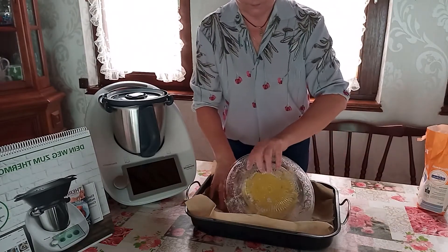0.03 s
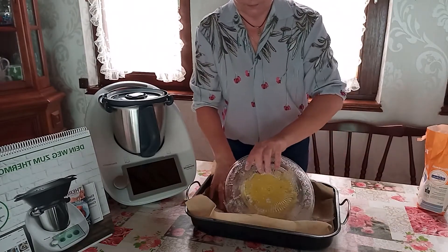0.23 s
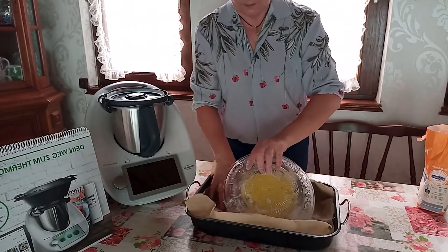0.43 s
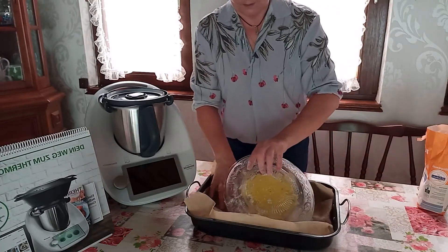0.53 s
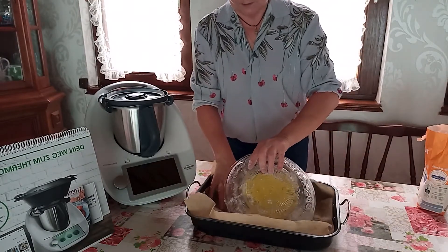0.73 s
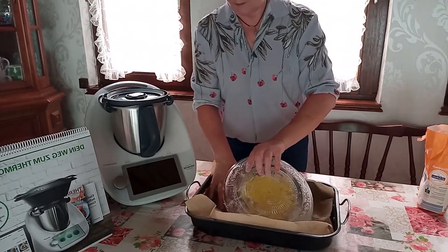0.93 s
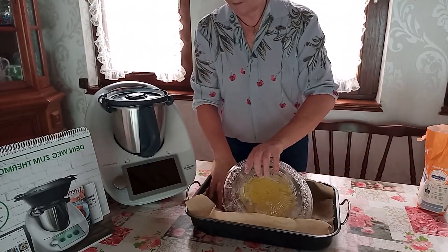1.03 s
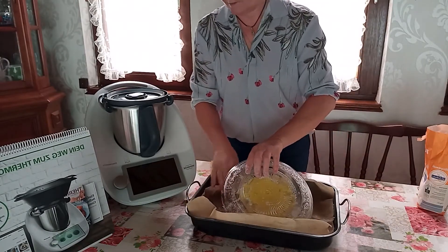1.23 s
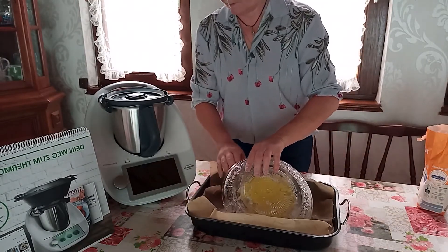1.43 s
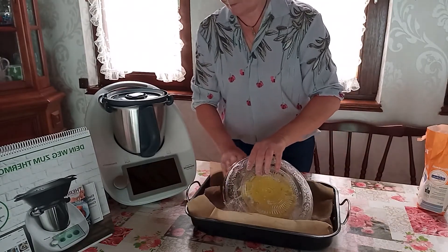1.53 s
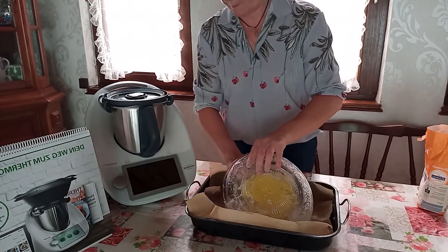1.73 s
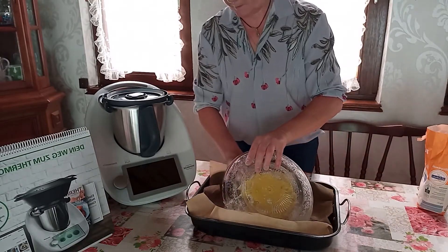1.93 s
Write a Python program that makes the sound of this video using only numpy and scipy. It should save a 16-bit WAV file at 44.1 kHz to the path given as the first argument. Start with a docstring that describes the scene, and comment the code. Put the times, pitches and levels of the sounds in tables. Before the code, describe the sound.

Baking paper crackles loudly as it is pushed into a metal tray, then rustles quietly under sliding fingers. A glass bowl lightly touches the lined tray and the table thuds softly, over a faint hum in a small kitchen.

```python
"""Small kitchen: a hand pushes baking parchment into a metal tray. Four loud strokes crumple it, tiny buckles
over sliding friction, with a broad sheet resonance that sinks as the paper slackens. Softer smoothing follows;
single creases snap throughout. A glass bowl touches the lined tray lightly, the air in the tray booms, the
table takes a few dull bumps, and a faint hum stands in the room."""
import sys
import numpy as np
from scipy import signal
from scipy.fft import rfft, irfft
from scipy.io import wavfile

SR = 44100
rng = np.random.default_rng(int(sys.argv[2]) if len(sys.argv) > 2 else 0)


def int16_out(signal):
    """Quantize to a 16-bit WAV file."""
    q = np.round(np.clip(np.atleast_2d(signal).T, -1, 1) * 32767)
    wavfile.write(sys.argv[1], SR, q.astype(np.int16))


N = 88200
TIME_S, BIN_HZ = np.arange(N) / SR, np.fft.rfftfreq(N, 1 / SR)
STROKE_LAG_MS, RUMBLE_CUT_HZ = 0.077, 123


# crumpling spectrum: (frequency [Hz], relative density [dB])
CRUMPLE_SPECTRUM = [(80, -17), (145, -14.5), (200, -17), (290, -9), (480, -7.5), (600, -2), (810, -2),
                    (1250, -2.5), (1450, -5), (1750, -3.5), (2250, -2.5), (3300, -3), (5000, -4.5),
                    (6100, -8.5), (7700, -7), (9200, -10.5), (12000, -6), (15800, -13.5)]
# stroke envelope: (time [s], relative level [dB], bass [dB], treble [dB])
STROKES = [(0.03, -71.5, 3, -6), (0.065, -63, -5, -2.5), (0.085, -51, -3, -1.5), (0.115, -45.5, -5.5, 1),
           (0.155, -36, -1.5, 0.5), (0.19, -39, -0.5, -3), (0.225, -43, 3.5, 4), (0.27, -53.5, 5, -2),
           (0.305, -50.5, -2, -5), (0.33, -35.5, -1, 1.5), (0.35, -33.5, 2.5, 0), (0.38, -37, -4.5, -4.5),
           (0.415, -36.5, 0.5, 3.5), (0.445, -38.5, -3.5, -2), (0.468, -44, -2, -5),
           (0.492, -42.5, -2, 5.5), (0.522, -36, -0.5, 2), (0.555, -41, 1, -4), (0.588, -37, -0.5, 0),
           (0.62, -48, -0.5, 2), (0.648, -46.5, 2.5, -1.5), (0.672, -37, 2, 3), (0.722, -38.5, 1.5, -1),
           (0.755, -35.5, -2, -0.5), (0.79, -42.5, -1, 2), (0.825, -50, -0.5, -3), (0.868, -45, 2, -2),
           (0.92, -57, -2.5, -4)]

def crumpling():
    """Four pushes: dense buckling over the hiss of sliding paper."""
    level_db, bass_db, treble_db = envelopes(STROKES)
    paper = crackle(rate_per_s=1700, scatter_s=0.0021, scatter_db=5, friction_db=3.5)
    paper = flap_and_crease(spread(paper, CRUMPLE_SPECTRUM), bass_db, treble_db)
    paper = delay_left(butter(paper, RUMBLE_CUT_HZ, "high"), STROKE_LAG_MS)
    pushing = TIME_S < SMOOTHING[0][0]
    return kitchen(paper * from_db(level_db + 3) * pushing, wet_db=-11)


def crackle(rate_per_s, scatter_s, scatter_db, friction_db):
    """Tiny buckles of random size, each scattered briefly by sheet and tray, over smooth friction."""
    onsets = rng.random(N) < rate_per_s / SR
    sizes = onsets * np.minimum(rng.exponential(1, N), 1.22)
    buckles = unit_rms(sizes * rng.choice([-1, 1], (2, N)))
    power = signal.lfilter([1], [1, -np.exp(-1 / (scatter_s * SR))], sizes ** 2)
    scatter = unit_rms(np.sqrt(power) * rng.standard_normal((2, N)))
    return buckles + from_db(scatter_db) * scatter + from_db(friction_db) * rng.standard_normal((2, N))


def flap_and_crease(x, bass_db, treble_db, bass_hz=1300, treble_hz=6800):
    """Broad flapping adds bass, tight creasing adds treble."""
    low = irfft(rfft(x) / (1 + (BIN_HZ / bass_hz) ** 4), N)
    high = x - irfft(rfft(x) / (1 + (BIN_HZ / treble_hz) ** 4), N)
    return low * from_db(bass_db) + (x - low - high) + high * from_db(treble_db)


# sheet resonances: (time [s], length [s], level [dB], start pitch [Hz], end pitch [Hz])
BULGES = [(0.125, .12, -49, 800, 399.7), (0.325, 0.12, -46, 520, 219.6), (0.488, 0.14, -52.5, 1100, 561.4),
          (0.66, .14, -47.5, 950, 521.6), (0.68, 0.196, -58, 328.6, 252.3), (0.948, 0.16, -62, 1350, 1091),
          (1.221, 0.1204, -66.5, 750, 500)]

def bulging(q=1.8, side_db=-18):
    """A broad sheet resonance: a noise band that sinks as the paper slackens."""
    bands = 0
    for start_s, length_s, db, start_hz, end_hz in BULGES:
        hz = np.exp(np.interp(TIME_S, [start_s, start_s + length_s], np.log([start_hz, end_hz])))
        phase = 2 * np.pi * np.cumsum(hz) / SR
        width_hz = np.sqrt(start_hz * end_hz) / q
        slow = unit_rms(butter(rng.standard_normal((2, 2, N)), width_hz / 2, "low"))
        mid, side = slow[0] * np.cos(phase) + slow[1] * np.sin(phase)
        bands += from_db(db) * swell(start_s, length_s) * (mid + from_db(side_db) * side * [[1], [-1]])
    return kitchen(delay_left(butter(bands, RUMBLE_CUT_HZ, "high"), STROKE_LAG_MS), wet_db=-4)


# rubbing spectrum: (frequency [Hz], relative density [dB])
RUB_SPECTRUM = [(230, -10.5), (350, -2.5), (600, 0.5), (1000, -2), (1300, -1), (1700, -3.5), (2300, 1.5),
                (3200, 0), (4700, -3), (6400, -7), (7800, -6), (9200, -10.5), (12500, -6.5), (15800, -16)]
# smoothing envelope: (time [s], relative level [dB], bass [dB], treble [dB])
SMOOTHING = [(0.92, -59, 2, 6), (1.0, -57, 0.5, 3), (1.1, -65, 5.5, 6), (1.17, -64, 0, 8),
             (1.235, -58, 2, -0.5), (1.262, -53.5, -2, 9.5), (1.3, -61.5, 4, 8.5), (1.35, -77.5, 3, 10),
             (1.385, -63, -5, 9.5), (1.48, -79, 7, 3), (1.515, -66.5, -2, 7.5), (1.55, -56, 4, -0.5),
             (1.615, -56.5, -1.5, -5), (1.66, -56, 0.5, -1), (1.7, -66, 4, 3), (1.735, -59, -11, 7),
             (1.79, -76, -8, 6), (1.835, -70, 7, 0.5), (1.855, -60, 1, 1.5), (1.905, -71, -6, -4),
             (1.925, -63, 3, -22), (1.955, -61.5, -4, 1), (1.972, -50, -4.5, -8), (2.0, -50.5, -5, -2)]

def smoothing():
    """Fingers slide over the sheet: sparser, softer crackle."""
    level_db, bass_db, treble_db = envelopes(SMOOTHING)
    paper = crackle(rate_per_s=600, scatter_s=0.0023, scatter_db=7, friction_db=6.5)
    paper = flap_and_crease(spread(paper, RUB_SPECTRUM), bass_db, treble_db)
    paper = delay_left(paper, lag_ms=-0.042)
    sliding = TIME_S >= SMOOTHING[0][0]
    return kitchen(paper * from_db(level_db + 1.24) * sliding, wet_db=-7)


# crease snaps: (time [s], relative ring level [dB], pitch [Hz], relative crack level [dB])
SNAPS = [(0.028, -54, 2890, -47.5), (0.085, -29, 4200, -37), (0.325, -38, 2330, -27),
         (0.336, -25, 9000, -26), (0.357, -18.5, 4640, -21), (0.854, -36, 3000, -31.5),
         (0.942, -46, 4050, -45), (1.205, -41, 3440, -45), (1.248, -35, 4480, -34),
         (1.255, -33.5, 4560, -37.5), (1.2898, -33, 2870, -46), (1.363, -65, 5940, -54),
         (1.374, -46, 2800, -46.5), (1.498, -56, 4030, -57), (1.632, -30, 4900, -40.5),
         (1.649, -46, 5800, -40), (1.709, -43.5, 3500, -36.5), (1.8409, -34.5, 5130, -54),
         (1.915, -55, 2160, -48), (1.9646, -40, 2610, -35)]

def snaps(width_hz=1330, flutter_s=0.0014):
    """A crease flips: a sharp fluttering crack with a very short ring of its own."""
    cracks, t = np.zeros((2, N + SR)), TIME_S[:N // 100]
    radius = np.exp(-np.pi * width_hz / SR)
    numerator = np.array([1, 0, -1]) * (1 - radius ** 2) / 2
    for start_s, ring_db, hz, crack_db in SNAPS:
        flutter = rng.choice([-1., 1.], (2, len(t))) * np.exp(-t / flutter_s)
        flutter *= from_db(7) / np.sqrt(np.sum(flutter[0] ** 2))
        denominator = [1, -2 * radius * np.cos(2 * np.pi * hz / SR), radius ** 2]
        ringing = signal.lfilter(numerator, denominator, flutter)
        start = int(start_s * SR)
        cracks[:, start:start + len(t)] += from_db(ring_db + 9.5) * ringing + from_db(crack_db) * flutter
    return kitchen(butter(cracks[:, :N], 910, "high"), wet_db=1.5)


# bowl contacts: (time [s], impulse level [dB])
TOUCHES = [(0.316, -41), (1.709, -56), (1.914, -56)]
# bowl-on-tray modes: (frequency [Hz], gain [dB], T60 [s])
TRAY_MODES = [(570, -16.5, .06), (826, -5.5, 0.036), (914, -2, 0.026), (1310, -8, 0.032), (1735, -6, 0.06),
              (2110, -5, 0.035)]

def bowl():
    """Glass touches the tray lightly; the paper damps the ring."""
    hits = butter(impulses(TOUCHES), 200, "high")
    return kitchen(sum(from_db(db) * ring(hits, hz, t60_s) for hz, db, t60_s in TRAY_MODES), wet_db=-5)


# tray air booms: (time [s], length [s], level [dB])
BOOMS = [(0.167, 0.16, -70.5), (0.326, 0.37, -65), (0.673, 0.19, -73.5)]
# dull bumps: (time [s], impulse level [dB])
BUMPS = [(0.236, -62), (0.575, -60), (0.79, -63), (0.88, -68), (1.28, -75), (1.77, -70)]

def tray_and_table():
    """The air in the tray booms under the pushes and the table thuds under the hand."""
    pushes = sum(from_db(db) * swell(start_s, length_s) for start_s, length_s, db in BOOMS)
    boom = pushes * unit_rms(ring(rng.standard_normal(N), hz=137.3, t60_s=0.34))
    thuds = ring(impulses(BUMPS), hz=54, t60_s=0.17)
    return (boom + thuds) * from_db([[-2], [1.5]])


# hum tones: (frequency [Hz], base rms level [dB])
HUM_TONES = [(344.5, -73.5), (409.1, -83), (540, -78.5)]
# hum envelope: (time [s], gain [dB])
HUM_SWELL = [(0, -1.5), (0.95, -2.5), (1.15, 1), (1.6, 0), (2.0, -10.5)]

def hum(waver_hz=8.02):
    """Three faint tones waver in level and phase, swell and fade."""
    tones = 0
    for hz, db in HUM_TONES:
        waver = 1.16 + drift(waver_hz) + 1j * drift(waver_hz)
        tones += from_db(db) * unit_rms(np.real(np.exp(2j * np.pi * hz * TIME_S) * waver))
    return tones * from_db(envelopes(HUM_SWELL)[0])


# room air spectrum: (frequency [Hz], relative density [dB])
AIR_SPECTRUM = [(45, -3), (84, 1.5), (157, -3), (360, -0.5), (600, -1.5), (900, -22), (3000, -33),
                (7000, -48), (11000, -54), (15800, -32)]

def room_air(level_db=-72):
    """Steady, dull noise."""
    return from_db(level_db) * spread(rng.standard_normal((2, N)), AIR_SPECTRUM)


def kitchen(x, wet_db, t60_s=0.43, treble_t60_s=0.3, treble_hz=6800, first_echo_s=0.0014):
    """Direct sound plus dense reflections whose treble dies sooner."""
    t = TIME_S[:N // 4]
    noise = rng.standard_normal((2, len(t)))
    dull = butter(noise, treble_hz, "low", order=1)
    tail = dull * from_db(-60 * t / t60_s) + (noise - dull) * from_db(-60 * t / treble_t60_s)
    tail *= t > first_echo_s
    tail /= np.sqrt(np.sum(tail ** 2) / 2)
    return x + from_db(wet_db) * signal.fftconvolve(np.atleast_2d(x), tail, axes=1)[:, :N]


# left-right likeness: (frequency [Hz], correlation [-1..1])
CORRELATION = [(60, 0), (250, 0.4), (600, 0.88), (1200, 0.24), (2500, 0.3), (5000, -0.03), (15000, -0.07)]
# stereo balance: (frequency [Hz], left minus right [dB])
BALANCE = [(60, 1), (250, -2), (600, -1.5), (4000, -0.5), (10000, 0.5)]

def spread(pair, spectrum):
    """Two signals become one coloured stereo sound, most alike in the low mids; rms 1."""
    corner_hz = spectrum[0][0] / 2
    low_cut = BIN_HZ ** 2 / (BIN_HZ ** 2 + corner_hz ** 2)
    mid, side = rfft(pair) * from_db(per_bin(spectrum)) * low_cut
    correlation, sign = per_bin(CORRELATION), np.array([[1], [-1]])
    stereo = np.sqrt(1 + correlation) * mid + sign * np.sqrt(1 - correlation) * side
    return unit_rms(irfft(stereo * from_db(sign * per_bin(BALANCE) / 2), N))


def delay_left(x, lag_ms):
    """An off-centre source arrives later on the left; earlier if the lag is negative."""
    shift = np.exp(-2j * np.pi * BIN_HZ * lag_ms / 1000)
    return np.array([irfft(rfft(x[0]) * shift, N), x[1]])


def ring(x, hz, t60_s):
    """One mode: a unit impulse starts a decaying sine of height 1."""
    radius, angle = from_db(-60 / (t60_s * SR)), 2 * np.pi * hz / SR
    return signal.lfilter([0, np.sin(angle)], [1, -2 * radius * np.cos(angle), radius ** 2], x)


def impulses(rows):
    """One impulse per row."""
    x = np.full(N, 1e-18)
    for time_s, db in rows:
        x[int(time_s * SR)] = from_db(db)
    return x


def swell(start_s, length_s):
    """A rounded rise and a longer fall."""
    corners_s = [start_s, start_s + 0.3 * length_s, start_s + length_s]
    return np.sin(np.pi / 2 * np.interp(TIME_S, corners_s, [0, 1, 0]))


def drift(rate_hz):
    """Slow random wander, rms about 1."""
    return np.interp(TIME_S * rate_hz, np.arange(4000), rng.standard_normal(4000)) * np.sqrt(3 / 2)


def envelopes(rows):
    """Each value column, interpolated per sample."""
    times_s, *columns = np.transpose(rows)
    return [np.interp(TIME_S, times_s, column) for column in columns]


def per_bin(rows):
    """A curve interpolated per FFT bin, in log frequency."""
    hz, values = np.transpose(rows)
    return np.interp(np.log(BIN_HZ + 1), np.log(hz), values)


def butter(x, hz, kind, order=2):
    """Gentle low- or high-pass."""
    return signal.sosfilt(signal.butter(order, hz, kind, fs=SR, output="sos"), x)


def from_db(db):
    """Decibels to gain."""
    return 10 ** (np.asarray(db) / 20)


def unit_rms(x):
    """Scale to unit power."""
    return x / np.sqrt(np.mean(x ** 2) + 1e-20)


def scene():
    """Paper, bowl and table over hum and room air."""
    return crumpling() + bulging() + smoothing() + snaps() + bowl() + tray_and_table() + hum() + room_air()


def record(dry):
    """Steep low-pass at 15850 Hz."""
    return signal.sosfilt(signal.ellip(12, 0.1, 80, 15850, fs=SR, output="sos"), dry)


dry = scene()
out = record(dry)
int16_out(out)
```